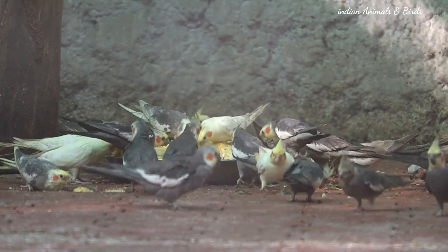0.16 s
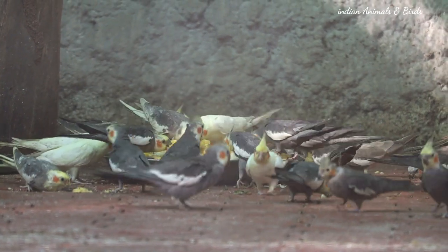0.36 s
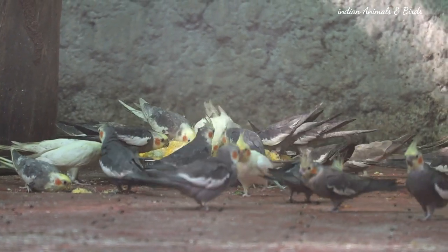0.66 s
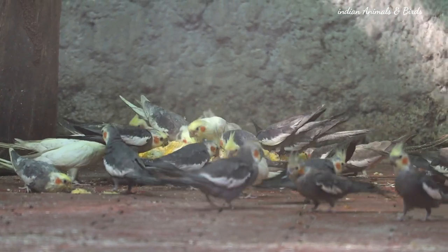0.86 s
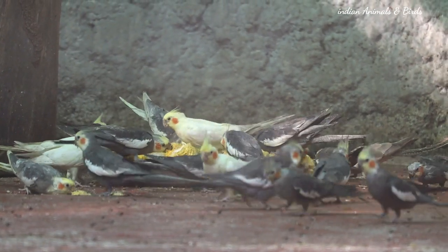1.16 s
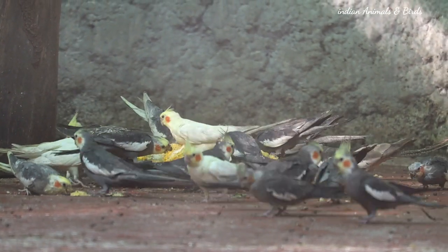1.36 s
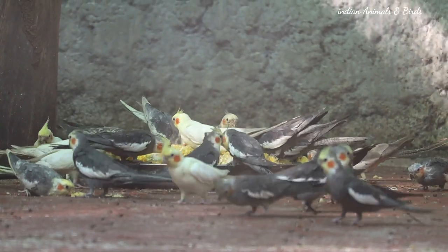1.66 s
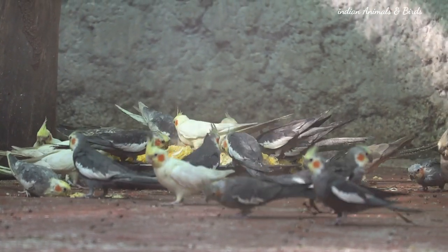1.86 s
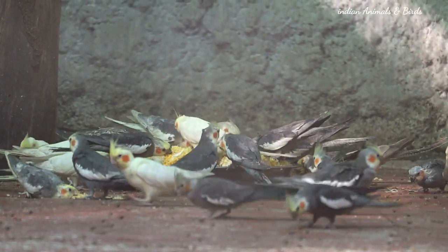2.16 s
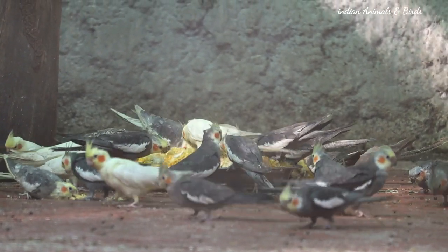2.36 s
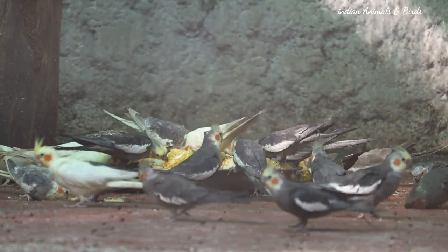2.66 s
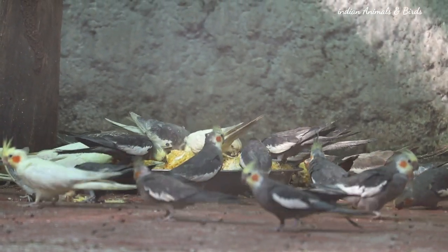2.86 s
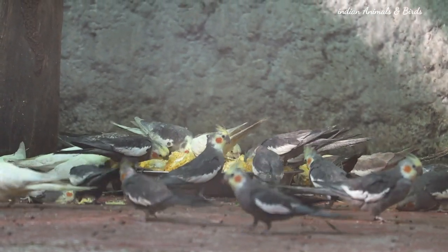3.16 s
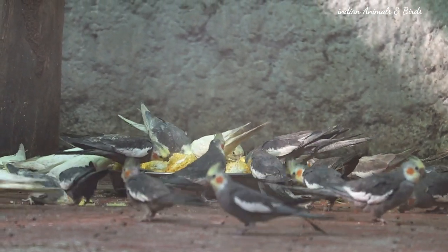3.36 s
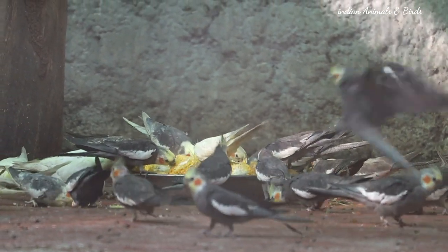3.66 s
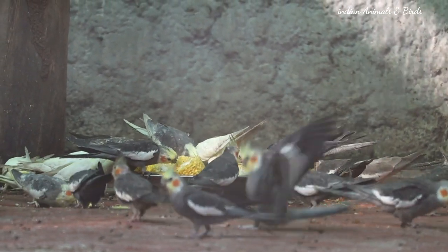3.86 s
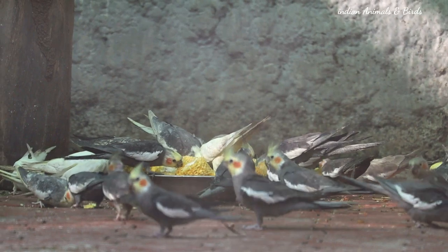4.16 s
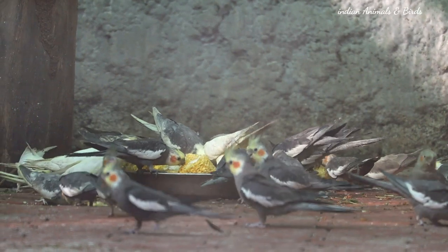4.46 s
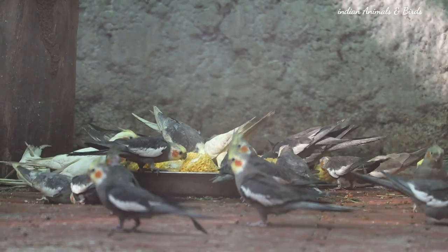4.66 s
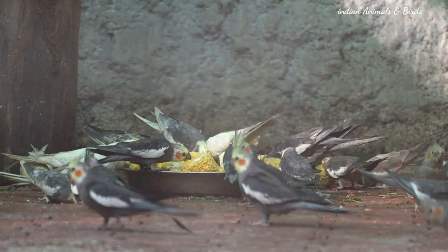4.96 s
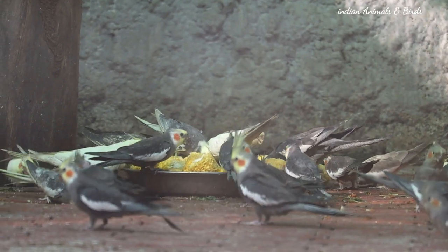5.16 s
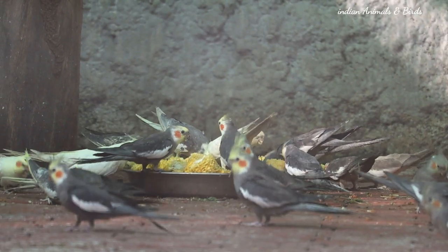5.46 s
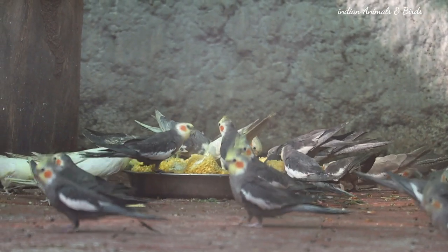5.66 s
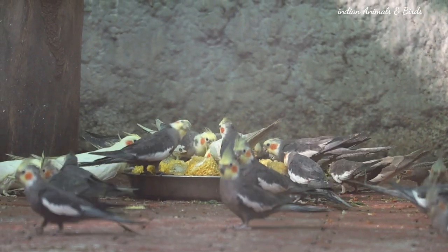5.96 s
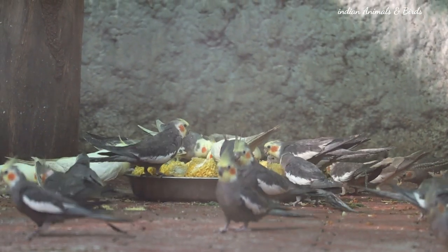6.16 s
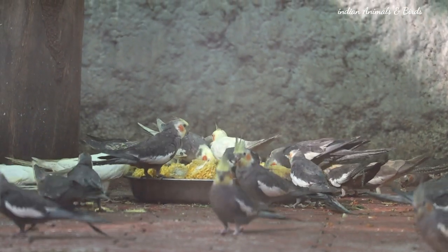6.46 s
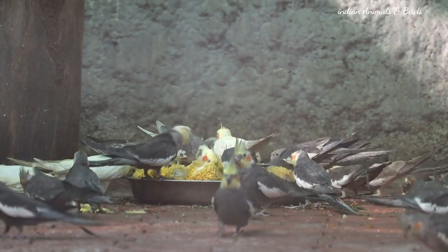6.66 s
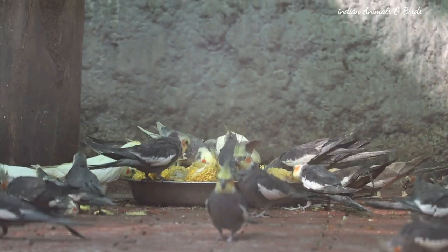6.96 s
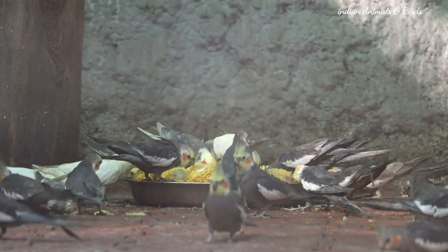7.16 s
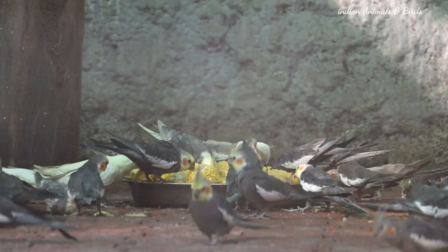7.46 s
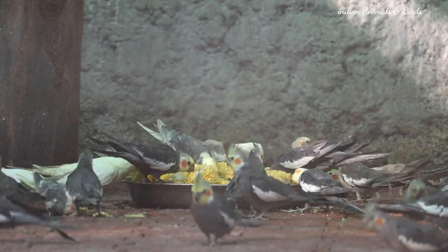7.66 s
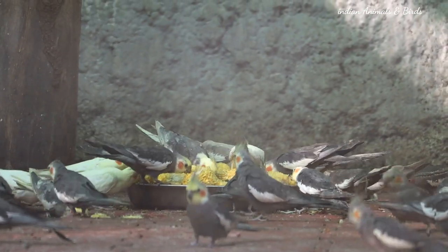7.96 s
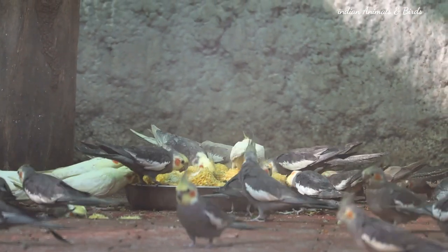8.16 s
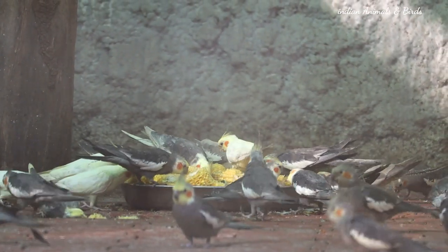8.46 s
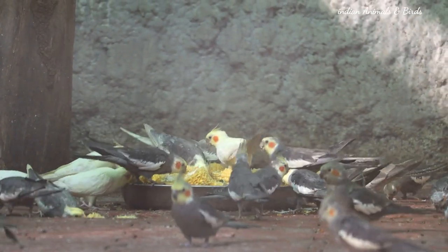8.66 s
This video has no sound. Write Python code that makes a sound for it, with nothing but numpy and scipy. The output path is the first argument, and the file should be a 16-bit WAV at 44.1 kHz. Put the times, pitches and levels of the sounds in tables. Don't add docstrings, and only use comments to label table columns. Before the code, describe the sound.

Many small parrots call inside a hard-walled pen. A close bird gives six loud, cracking up-and-down whistles in three pairs during the first five seconds, with neighbours chirping between them. Then two wide, clear whistles, fluted chirps and frequent raspy screeches take over as the background flock thickens. Walls throw back short, bright echoes; a faint low outdoor rumble and motor hum lie beneath. The microphone is close to the loudest caller, slightly left.

```python
import sys
import numpy as np
from scipy import signal
from scipy.io import wavfile
from scipy.ndimage import uniform_filter1d

SR = 44100
rng = np.random.default_rng(int(sys.argv[2]) if len(sys.argv) > 2 else 0)


def to_wav(s):
    ch = np.atleast_2d(s).T
    pcm = np.round(np.clip(ch, -1, 1) * 32767)
    wavfile.write(sys.argv[1], SR, pcm.astype(np.int16))


def voltage_ratio(decibels):
    exponent = np.asarray(decibels, float) / 20
    return 10 ** exponent


N = 387638

# (f/Hz, likeness/0..1)
LIKENESS = [(60, 0.99), (250, 0.97), (700, 0.72), (1500, 0.061), (4000, 0.036), (10000, 0.033)]
# (left delay/s, right delay/s, level/dB)
SLAPS = [(.004, .0046, -9.5), (.013, .0115, -7), (.024, .026, -12), (.041, 0.034, -17.5)]
PEN_T60_S, PEN_CUT_HZ = 0.4, 8400

# (f/Hz, level/dB)
RUMBLE = [(12, -58), (20, -43), (43, -2.5), (114, -2), (260, -7), (414, -11), (497, -11), (910, -20),
          (2210, -19.5), (2500, -54.5), (3250, -67), (5500, -120)]
RUMBLE_DB, MIC_LOW_HZ = -34.5, 42
HUM_HZ, HUM_DB, HISS_DB = 66.3, -47, -55.5

# (t/s, level/dB)
FLOCK = [(0, -41), (.3, -41), (.85, -44.5), (1.3, -33.5), (2.2, -37), (2.65, -37.5), (3.1, -30.5),
         (3.899, -42.5), (4.3, -38), (4.75, -43.5), (5.0, -38.5), (5.4, -35), (6.2, -29), (6.7, -31.5),
         (7.7, -30), (8.4, -29.5), (8.79, -41.5)]
# (f/Hz, level/dB per Hz)
CHORUS = [(590, -15), (1000, -6.5), (1390, -8), (1840, -12), (2620, 3.5), (3530, 11), (3940, -2),
          (4940, -9), (6500, -35), (8450, -39), (14300, -120)]

# (t/s, length/s, from f/Hz, to f/Hz, level/dB)
GLIDES = [(0, 0.037, 2020, 1650, -41), (0.026, 0.032, 1665, 2130, -39.5), (0.128, 0.031, 2280, 1540, -48.5),
          (0.36, 0.057, 1970, 2690, -33), (2.199, .11, 1700, 1600, -39.5), (2.309, .16, 1620, 1766, -37.5),
          (1.873, 0.0494, 1746, 1956, -39), (2.466, 0.09, 1765, 2000, -35.5), (4.86, 0.12, 1800, 2390, -39),
          (4.998, 0.26, 1946, 1634, -39.5), (7.334, .09, 1740, 1950, -38), (5.74, .12, 1830, 1920, -30),
          (5.86, .12, 1920, 1780, -32), (2.13, .07, 1950, 1780, -40), (7.96, .06, 2050, 2150, -38)]
# (crest t/s, rise/s, fall/s, crest f/Hz, level/dB)
NEAR_ARCHES = [
    (.78, 0.11, 0.041, 2116, -39.5),
    (1.17, 0.16, 0.055, 2123, -36.5),
    (1.86, .07, 0.032, 2400, -38),
    (1.991, 0.091, .15, 2396, -26),
    (2.091, 0.054, 0.051, 2011, -33.5),
    (2.801, 0.055, 0.17, 2120, -33),
    (4.13, 0.046, 0.032, 2162, -37),
    (5.62, 0.067, 0.066, 2120, -39.5),
    (7.88, 0.049, 0.078, 2071, -28.5),
    (3.89, .11, .11, 2092, -43),
]
# (share of rise or fall, share of crest pitch, level/dB)
PEAKED_SHAPE = [(-1, .72, -10), (-.55, .86, -5), (-.2, .96, 0), (-0.021, 1.0, 1), (.2, 0.93, -1),
                (.5, .86, -4), (1, .8, -16.5)]
# (f/Hz, level/dB)
NEAR_PIPE = [(1500, 1), (2050, -4.5), (2450, -22)]
# (crest t/s, rise/s, fall/s, crest f/Hz, level/dB)
FLUTED = [
    (1.72, 0.069, 0.082, 2520, -28),
    (6.52, 0.097, 0.15, 2159, -24),
    (7.05, 0.061, 0.16, 2345, -32.5),
    (8.26, .06, 0.068, 2380, -41),
    (8.48, 0.069, 0.13, 2140, -36.5),
    (8.55, .05, 0.057, 1900, -41.5),
]
# (share of rise or fall, share of crest pitch, level/dB)
FLUTED_SHAPE = [(-1, .72, -15), (-.7, .85, -3), (-.3, .91, -2.5), (0, 0.98, 2.5), (.35, .92, -3),
                (.7, .92, -4.5), (1, .74, -12.5)]
# (f/Hz, level/dB)
FLUTED_PIPE = [(1500, 1), (2400, -29.5)]
NEAR_PAN_DB = -2.3

# (t/s, length/s,
# from f/Hz, to f/Hz, level/dB)
FAR = [(0.056, 0.068, 2820, 2766, -40), (0.259, 0.27, 4035, 3860, -36), (0.191, 0.28, 1478, 1346, -45),
       (1.301, 0.33, 4310, 3930, -37.5), (1.295, 0.23, 1516, 1408, -46.5), (1.778, 0.21, 3600, 3600, -37.5),
       (2.211, 0.084, 3720, 3450, -30), (2.824, 0.3, 4080, 3830, -38), (3.28, .12, 3840, 3200, -43),
       (4.227, 0.099, 3700, 4600, -40), (5.423, 0.33, 2755, 2760, -46), (5.756, 0.14, 3790, 3550, -24),
       (6.319, 0.089, 4640, 4460, -34), (6.577, .16, 3200, 3110, -29), (6.85, 0.29, 3336, 3270, -34.5),
       (7.215, .17, 3493, 3080, -30), (6.849, .15, 2750, 2676, -39.5), (7.8, 0.28, 3060, 2975, -36),
       (8.18, .24, 3000, 2920, -35), (8.52, .27, 2960, 2880, -34), (7.863, .11, 4180, 3290, -34.5),
       (8.058, 0.22, 3834, 3735, -33.5), (8.387, 0.087, 3460, 3940, -35.5), (8.487, .1, 3890, 3600, -36)]
FAR_SAG_DB = -2

# (t/s, length/s, level/dB)
SCREECHES = [(0.2, 0.36, -37.5), (0.898, 0.072, -33), (1.275, 0.3, -36), (2.23, 0.068, -34.5),
             (2.747, 0.3, -35), (3.26, 0.14, -45.5), (3.54, 0.089, -45.5), (3.797, 0.11, -51),
             (4.107, 0.25, -40), (5.404, 0.13, -39.5), (6.102, .18, -35.5), (6.32, .2, -32.5),
             (6.56, .22, -33.5), (6.86, 0.28, -35), (7.19, .26, -35), (7.484, 0.3, -35.5), (7.85, .14, -36),
             (8.03, .12, -37.5), (8.18, .15, -36.5), (8.38, .16, -40)]
# (f/Hz, level/dB per Hz)
RASP = [(2500, -10.5), (4000, 10.5), (5700, 2.5), (8000, -9.5), (10000, 3), (11000, -15.5), (13000, -12.5),
        (16000, -41)]
SQUAWK_DB = [-28, -3, -6, -11.5, -17, -18]
SQUAWK_HZ = 1524

# (voice jumps up t/s, voice drops t/s, crest f/Hz, early level/dB, late level/dB)
LOUD = [
    (0.461, 0.621, 3137, -11, -17),
    (0.974, 1.126, 3240, -12, -17),
    (2.309, 2.503, 3240, -8.5, -18),
    (2.812, 2.972, 3264, -13, -17.5),
    (4.355, 4.561, 3110, -9.5, -18),
    (4.943, 5.105, 3213, -11.5, -17),
]
# (t from jump/s, f/Hz, level/dB)
LOUD_CLIMB = [(-.075, 2050, -22), (-.04, 2460, -9), (-.013, 2640, -4.5)]
# (t from drop/s, f/Hz, level/dB)
LOUD_SLIDE = [(-.018, 3048, -0.5), (0, 2950, 3.5), (.022, 2500, -2), (0.044, 2364, -8.5), (.068, 2100, -18)]
# (f/Hz, 2nd level/dB, 3rd level/dB)
LOUD_PIPE = [(2000, -9, -14), (2500, -24.5, -32.5), (2950, -29, -42), (3140, -42, -32)]
CREST_S, SETTLE_SHARE, SETTLE_HZ = 0.0555, 0.67, 3060
LEAP_SHARE = 0.553
STEP_S, SAG_HZ = 0.025, 45
STRAIN_HZ, STRAIN_DB_PER_HZ = 3133, 0.08
LOUD_PAN_DB = -2.5

# (t/s, f/Hz, level/dB)
QUARREL = [
    [(4.13, 1493, -49.5), (4.19, 2107, -27), (4.24, 2480, -22), (4.27, 2260, -23), (4.34, 2070, -26)],
    [(4.1, 1750, -51.5), (4.18, 1850, -39), (4.3, 2050, -33)],
]

# (t/s, f/Hz, level/dB)
DOMES = [
    [(4.38, 1900, -34.5), (4.42, 2370, -28), (4.55, 2354, -26.5), (4.61, 1844, -37.5)],
    [(4.87, 1530, -48), (4.92, 1995, -29), (4.97, 2334, -26), (5.1, 2492, -30), (5.18, 2397, -25.5),
     (5.22, 2210, -27.5), (5.245, 1800, -42)],
]
# (t/s, length/s, crest f/Hz, level/dB)
WIDE = [
    (5.696, .355, 3510, -20.5),
    (7.435, .37, 3404, -22),
]
# (share of length, share of crest pitch, level/dB)
WIDE_SHAPE = [(0, .55, -16), (.165, .7, -4), (.33, .805, -1), (.48, 0.95, 0), (.6, 0.98, 0),
              (.815, .955, 0), (.86, 0.7, -7), (.93, .67, -7), (1, .515, -18)]
# (f/Hz, 2nd level/dB, 3rd level/dB)
CLEAR_PIPE = [(1510, 16, -5.5), (1900, 4, -6.5), (2400, -11, -23), (2840, -0.5, -17.5), (3200, -13, -36),
              (3450, -37, -30)]
WIDE_PAN_DB, DOME_PAN_DB = -1.5, -1.5


def rms_one(x):
    return x / np.sqrt(np.mean(x ** 2) + 1e-20)


def at_hz(points, hz):
    table = np.array(points)
    return np.interp(np.log(hz), np.log(table[:, 0]), table[:, 1])


def drift(rate_hz, size=N):
    r = np.exp(-2 * np.pi * rate_hz / SR)
    white = rng.standard_normal(size + 8000)
    smooth = signal.lfilter([1], [1, -2 * r, r * r], white)
    return rms_one(smooth[8000:])


def banded_noise(spectrum, patchy_db, rate_hz, count=3):
    low, high = spectrum[0][0], spectrum[-1][0]
    edges = low * 2 ** np.arange(0, np.log2(high / low) + 0.1, 1 / count)
    white = rng.standard_normal((2, 2, N))
    out = 0
    for k, (a, b) in enumerate(zip(edges, edges[1:])):
        band = signal.butter(2, [a, b], "band", fs=SR, output="sos")
        mid, side = signal.sosfilt(band, white[k % 2])
        centre_hz = np.sqrt(a * b)
        alike = np.clip(at_hz(LIKENESS, centre_hz), -1, 1)
        gain = voltage_ratio(at_hz(spectrum, centre_hz) + patchy_db * drift(rate_hz))
        shared = np.sqrt(1 + alike) * mid
        apart = np.sqrt(1 - alike) * side * [[1], [-1]]
        out = out + gain * (shared + apart)
    return rms_one(out)


def whistle(rows, pan_db, rough, flutter_hz, fall_db, crack):
    s, pitch, *partials_db = np.transpose(rows)
    t = np.arange(max(round(s[0] * SR), 0), min(round(s[-1] * SR), N)) / SR
    pitch_hz = uniform_filter1d(np.interp(t, s, pitch), size=200, mode="nearest")
    climb = np.clip(np.gradient(pitch_hz) * SR / 10000, 0, 1)
    wander = rough * drift(flutter_hz, len(t)) + crack * climb * drift(160, len(t))
    phase = 2 * np.pi * np.cumsum(pitch_hz) / SR + wander
    levels_db = [np.interp(t, s, p) for p in partials_db]
    levels_db += [levels_db[-1] + fall_db * k for k in range(1, 7 - len(levels_db))]
    tone = 0
    for k, db in enumerate(levels_db, 1):
        tone = tone + voltage_ratio(db) * np.sin(k * phase) * (k * pitch_hz < 16000)
    flutter = (1 + rough * drift(flutter_hz, len(t))) / np.sqrt(1 + rough ** 2)
    fade = np.clip(np.minimum(t - s[0], s[-1] - t) / 0.0047, 0, 1)
    pan = voltage_ratio(np.array([[pan_db / 2], [-pan_db / 2]]))
    return round(t[0] * SR), np.sqrt(2) * tone * flutter * fade * pan


def callers(calls, pans_db, rough, flutter_hz, fall_db, crack=0.):
    out = np.zeros((2, N))
    for rows, pan_db in zip(calls, pans_db):
        at, sound = whistle(rows, pan_db, rough, flutter_hz, fall_db, crack)
        out[:, at:at + sound.shape[1]] += sound
    return out


def voiced_by(pipe, calls):
    pitch, *over_db = np.transpose(pipe)
    return [[(s, hz, db, *(db + np.interp(hz, pitch, o) for o in over_db)) for s, hz, db in call]
            for call in calls]


def arch(shape, crest_s, rise, fall, crest_hz, db):
    return [(crest_s + u * (rise if u < 0 else fall), crest_hz * share, db + rel) for u, share, rel in shape]


def glide(s, length, from_hz, to_hz, db, sag_db=0):
    return [(s, from_hz, db), (s + length, to_hz, db + sag_db)]


def slapback(x):
    out = x.copy()
    for left_s, right_s, db in SLAPS:
        for ear, delay_s in enumerate([left_s, right_s]):
            lag = round(delay_s * SR)
            out[ear, lag:] += voltage_ratio(db) * x[ear, :-lag]
    return out


def pen(x):
    t = np.arange(round(0.7 * SR)) / SR
    tail = rng.standard_normal((2, len(t))) * voltage_ratio(-60 * t / PEN_T60_S) * (t > 0.006)
    tail = signal.sosfilt(signal.butter(1, PEN_CUT_HZ, fs=SR, output="sos"), tail)
    tail = tail / np.sqrt(np.sum(tail ** 2, axis=1, keepdims=True))
    return signal.fftconvolve(x, tail, axes=1)[:, :N]


def outdoor_rumble():
    rumble = voltage_ratio(RUMBLE_DB) * banded_noise(RUMBLE, patchy_db=1.0, rate_hz=1.0) * voltage_ratio([[0.3], [-0.3]])
    return signal.sosfilt(signal.butter(2, MIC_LOW_HZ, "high", fs=SR, output="sos"), rumble)


def motor_hum():
    peak = signal.iirpeak(HUM_HZ, 8.0, fs=SR)
    return voltage_ratio(HUM_DB) * rms_one(signal.lfilter(*peak, rng.standard_normal(N)))


def microphone_hiss():
    bright = signal.butter(1, 4000, "high", fs=SR, output="sos")
    return voltage_ratio(HISS_DB) * signal.sosfilt(bright, rng.standard_normal((2, N)))


def flock_chorus():
    draws = rng.random((220, 4))
    calls = []
    for when, height, length, _ in draws:
        s, top_hz = 8.7 * when, 1900 * 2.3 ** height
        calls.append([(s, top_hz * 0.97, -6), (s + 0.06, top_hz, 0),
                      (s + 0.088 + 0.2 * length, top_hz * 1.1, 0),
                      (s + 0.15 + 0.24 * length, top_hz * 0.38, -6)])
    pans_db = 8 * (draws[:, 3] - 0.5)
    voices = pen(callers(calls, pans_db, rough=0.61, flutter_hz=50, fall_db=-10.5))
    blur = banded_noise(CHORUS, patchy_db=1.3, rate_hz=12)
    s, level_db = np.transpose(FLOCK)
    swell = voltage_ratio(np.interp(np.arange(N) / SR, s, level_db))
    return swell * rms_one(blur + 0.91 * rms_one(voices))


def neighbours():
    rich = [arch(PEAKED_SHAPE, *row) for row in NEAR_ARCHES] + [glide(*row) for row in GLIDES]
    fluted = [arch(FLUTED_SHAPE, *row) for row in FLUTED]
    calls = voiced_by(NEAR_PIPE, rich) + voiced_by(FLUTED_PIPE, fluted)
    return callers(calls, [NEAR_PAN_DB] * len(calls), rough=0.38, flutter_hz=60, fall_db=-12)


def far_birds():
    calls = [glide(*row, sag_db=FAR_SAG_DB) for row in FAR]
    return callers(calls, rng.normal(1, 3.5, len(FAR)), rough=1.15, flutter_hz=83, fall_db=-24.5)


def screeches():
    t, strength = np.arange(N) / SR, 0
    partials_db = np.array(SQUAWK_DB)
    squawks = []
    for s, length, db in SCREECHES:
        rise = np.clip((t - s) / 0.019, 0, 1)
        fading_db = 3.7 * (t - s) + 120 * np.maximum(t - s - length, 0)
        strength = strength + rise * voltage_ratio(db - fading_db)
        squawks.append([(s, SQUAWK_HZ, *(db + partials_db)),
                        (s + length, SQUAWK_HZ * (1 - 0.3 * length), *(db - 10.5 + partials_db))])
    voiced = callers(squawks, np.zeros(len(squawks)), rough=0.6, flutter_hz=90, fall_db=-3)
    breath = strength * banded_noise(RASP, patchy_db=3.5, rate_hz=7.4, count=6)
    return breath + voltage_ratio(-15) * voiced + pen(voiced)


def loud_call(jump, drop, crest_hz, early_db, late_db):
    settle_s = jump + SETTLE_SHARE * (drop - jump)
    crest_db = early_db - STRAIN_DB_PER_HZ * max(crest_hz - STRAIN_HZ, 0)
    climb = [(jump + s, hz, early_db + db) for s, hz, db in LOUD_CLIMB]
    leap = (jump, SETTLE_HZ + LEAP_SHARE * (crest_hz - SETTLE_HZ), early_db)
    crest = (jump + CREST_S, crest_hz, crest_db)
    held = (settle_s - STEP_S, crest_hz - SAG_HZ, crest_db)
    settled = (settle_s, SETTLE_HZ, late_db)
    slide = [(drop + s, hz, late_db + db) for s, hz, db in LOUD_SLIDE]
    return climb + [leap, crest, held, settled] + slide


def loud_bird():
    calls = voiced_by(LOUD_PIPE, [loud_call(*row) for row in LOUD])
    return callers(calls, [LOUD_PAN_DB] * len(calls), rough=0.38, flutter_hz=80, fall_db=-13, crack=1.3)


def quarrel():
    calls = voiced_by(CLEAR_PIPE, QUARREL)
    return callers(calls, [-3, -2], rough=0.5, flutter_hz=80, fall_db=-7, crack=0.25)


def clear_birds():
    wide = [[(s + length * u, hz * share, db + rel) for u, share, rel in WIDE_SHAPE]
            for s, length, hz, db in WIDE]
    pans_db = [WIDE_PAN_DB] * len(wide) + [DOME_PAN_DB] * len(DOMES)
    calls = voiced_by(CLEAR_PIPE, wide + DOMES)
    return callers(calls, pans_db, rough=0.47, flutter_hz=58.0, fall_db=-4, crack=0.091)


def scene():
    outside = outdoor_rumble() + motor_hum() + microphone_hiss()
    flock = flock_chorus()
    near = neighbours() + quarrel()
    far = far_birds()
    harsh = screeches()
    loud = loud_bird()
    clear = clear_birds()
    direct = slapback(voltage_ratio(2.5) * loud + voltage_ratio(2.0) * clear + voltage_ratio(1.5) * near + voltage_ratio(-3.5) * far)
    echoes = pen(voltage_ratio(-3.5) * loud + voltage_ratio(-2.5) * clear + voltage_ratio(-2.5) * near + far)
    return direct + echoes + flock + harsh + outside


def band_limit(x):
    return signal.sosfilt(signal.butter(12, 15500, fs=SR, output="sos"), x)


def record(dry):
    level_db = 10 * np.log10(uniform_filter1d(np.mean(dry ** 2, axis=0), size=900) + 1e-12)
    recovery_db = 15.3 * np.arange(N) / SR
    held_db = np.maximum.accumulate(level_db + recovery_db) - recovery_db
    duck_db = -0.3 * np.maximum(held_db + 23, 0)
    ducked = dry * voltage_ratio(uniform_filter1d(duck_db, size=400))
    mix = 1.3 * np.tanh(ducked / 1.3)
    return band_limit(mix)


dry = scene()
out = record(dry)
to_wav(out)
```